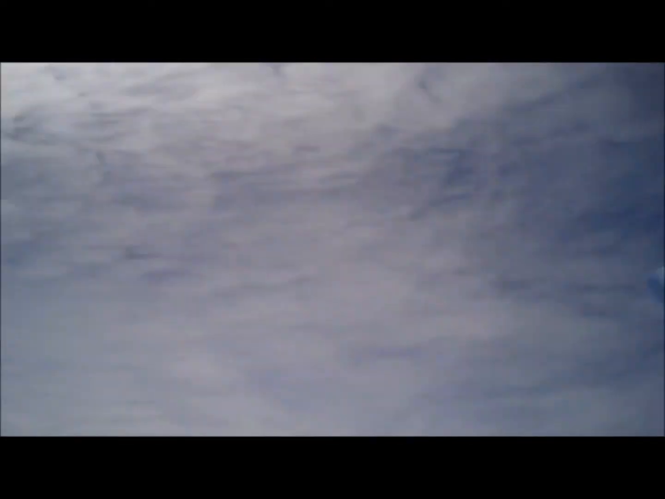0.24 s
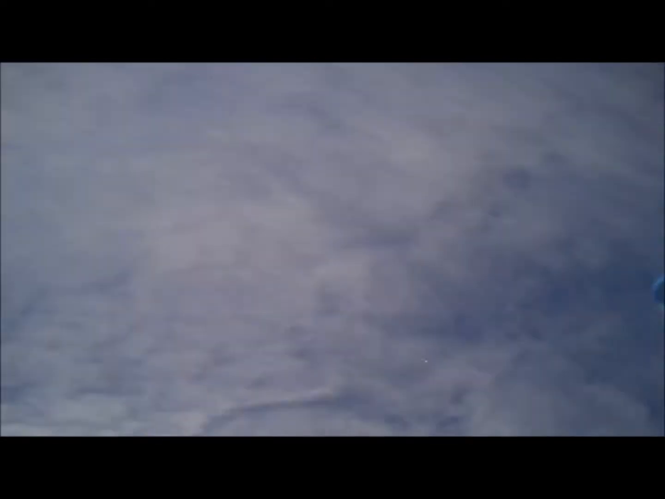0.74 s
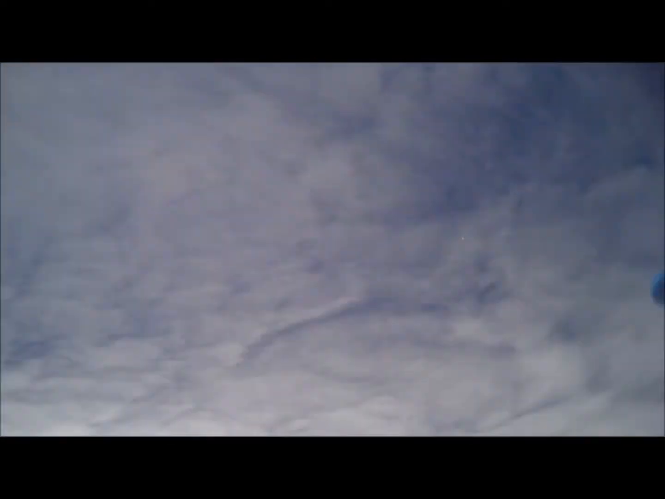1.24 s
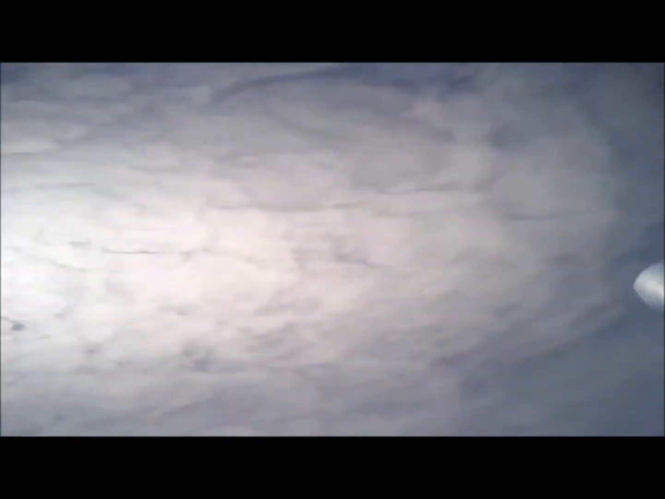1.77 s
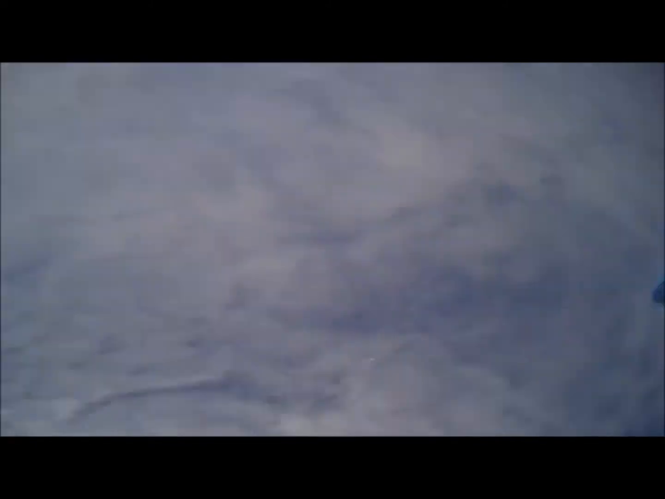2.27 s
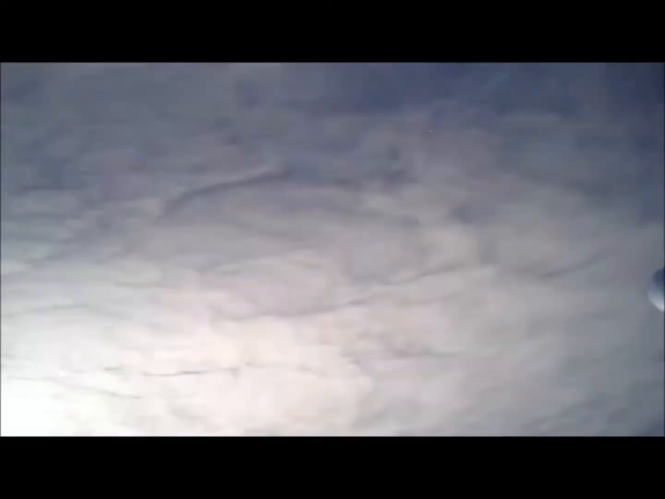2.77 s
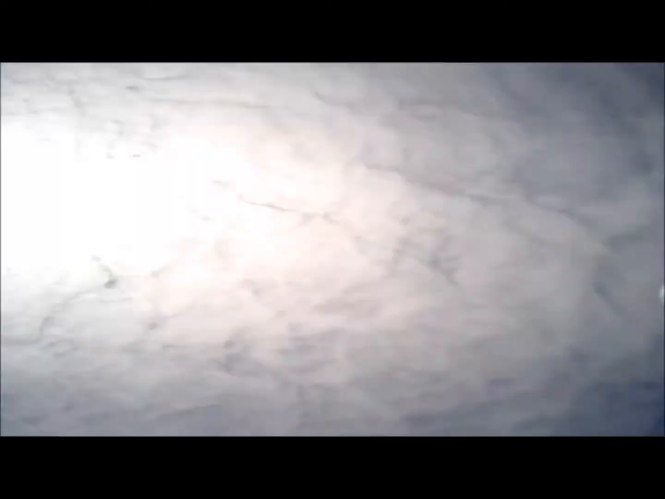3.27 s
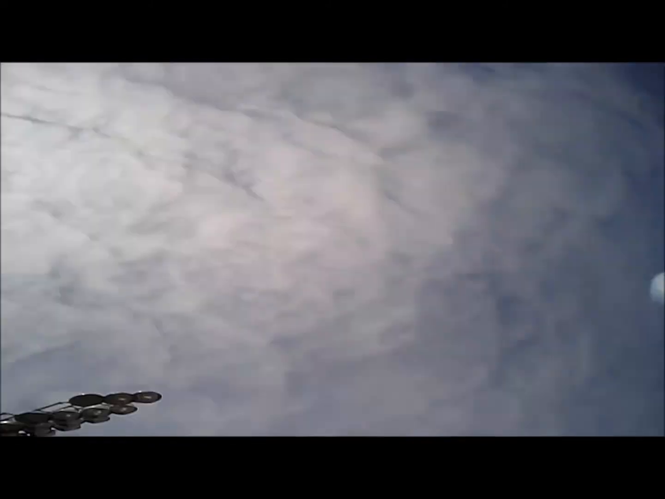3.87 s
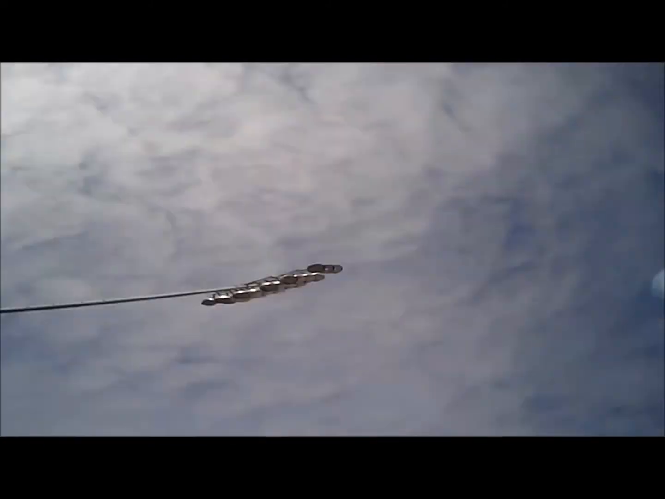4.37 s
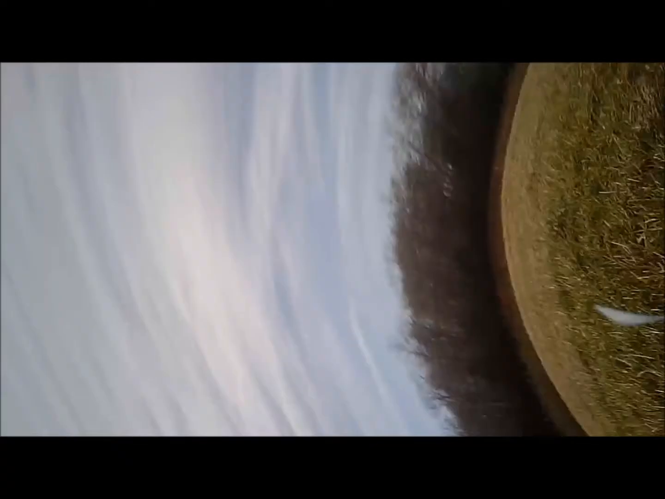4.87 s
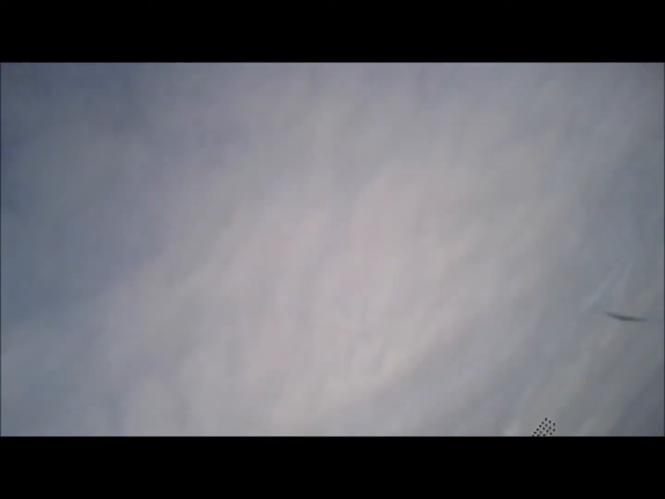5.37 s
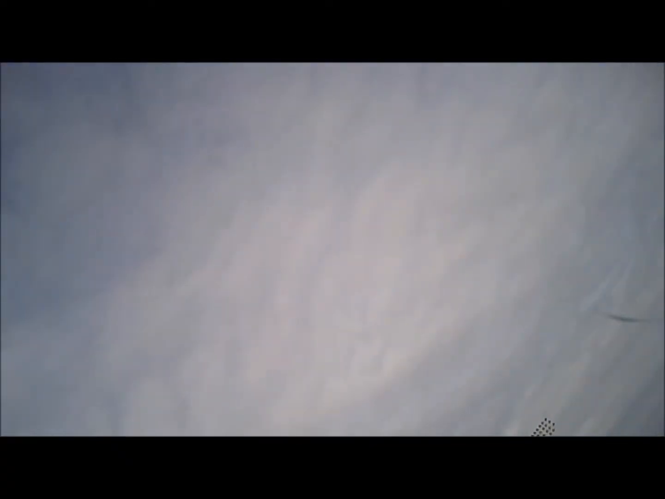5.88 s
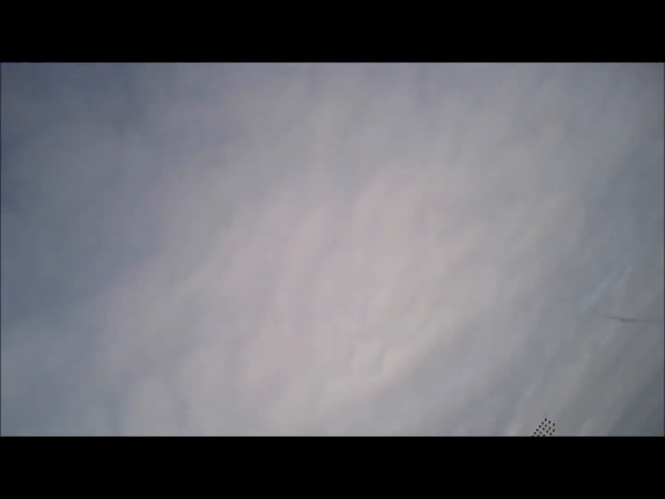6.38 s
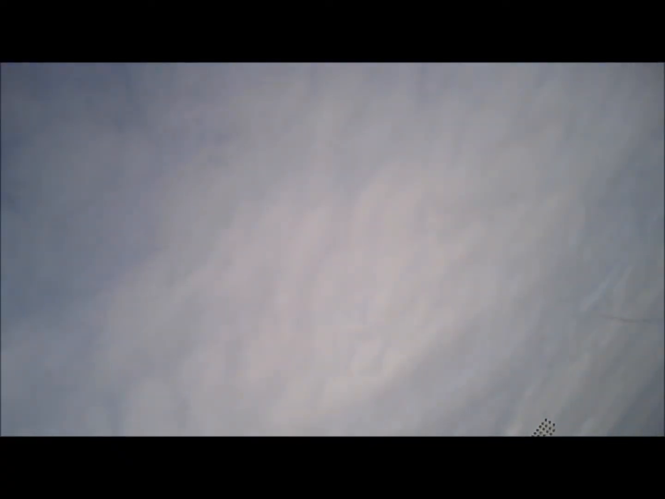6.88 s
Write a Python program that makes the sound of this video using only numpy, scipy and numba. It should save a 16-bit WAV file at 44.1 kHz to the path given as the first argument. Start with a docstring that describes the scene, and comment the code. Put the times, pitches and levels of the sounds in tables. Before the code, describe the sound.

Rushing air buffets a microphone riding on a model rocket, pulsing with each spin in whooshes, thin whistles and crackling snaps. A hard, overloaded impact cuts the wind off as the rocket strikes the ground. Its hollow shell rattles, a springy part buzzes, and two lighter knocks lead into a short slide through grass. Then the meadow is quiet, with small settling ticks, soft hiss and a low far-off drone.

```python
"""A small camera rides on a spinning model rocket. Turbulent air roars and hisses over it, crackling in gusts,
and shed eddies give a whoosh and a faint whistle on every turn. At 4.6 s the rocket slams into a meadow: the
blows ring its shell and overload the microphone. A springy part judders against the shell and buzzes on, then
the body bounces twice and slides to rest in the grass. Last, only a few settling ticks, a light breeze, a far
drone and hiss remain."""
import sys
import numpy as np
from scipy import signal
from scipy.fft import rfft, irfft, next_fast_len
from scipy.io import wavfile
from numba import njit

SR = 44100
rng = np.random.default_rng(int(sys.argv[2]) if len(sys.argv) > 2 else 0)


def store_pcm(level_fs):
    """Save levels as 16-bit WAV."""
    pcm = np.round(np.clip(level_fs, -1, 1) * 32767).astype(np.int16)
    wavfile.write(sys.argv[1], SR, np.atleast_2d(pcm).T)


N = 313992

# turns of the rocket: (time of completion [s], buffeting gain [dB], swell of the roar [dB])
TURNS = [(-0.02, 0, -4), (0.36, -4, 4), (0.71, 6, 0.5), (1.07, -5.5, 3.5), (1.46, 2.5, 3), (1.85, 3, 1),
         (2.2, 0.5, 1.5), (2.569, -2, 3), (2.939, 0, 2.5), (3.33, 2.5, 4), (3.74, 1, 3), (4.149, 3.5, 2.5),
         (4.56, -4, 2), (4.96, 1.5, 2)]


def from_db(db):
    """Amplitude ratio of a level: 20 dB is a factor of ten."""
    return 10 ** (np.asarray(db) / 20)


def unit_rms(x):
    """Normalisation to a mean power of 1."""
    return x / np.sqrt(np.mean(x ** 2) + 1e-20)


def clock():
    """Time of every sample in seconds."""
    return np.arange(N) / SR


def in_time(rows):
    """Linear interpolation of each column against the times in the first."""
    times, *columns = np.transpose(rows)
    return [np.interp(clock(), times, column) for column in columns]


def low_pass(x, hz, order=2):
    """Maximally flat filter, falling 6 dB per octave and order above the cutoff."""
    return signal.sosfilt(signal.butter(order, min(hz, .45 * SR), fs=SR, output="sos"), x)


def drift(rate_hz):
    """Random fluctuation: noise confined mostly below the given rate, rms 1."""
    size = next_fast_len(N)
    hz = np.arange(size // 2 + 1) * SR / size
    return unit_rms(irfft(rfft(rng.standard_normal(size)) / (1 + (hz / rate_hz) ** 2), size)[:N])


def coloured(spectrum):
    """Spectral shaping of white noise, rms 1."""
    hz, db = np.transpose(spectrum)
    size = next_fast_len(N)
    bin_hz = np.maximum(np.arange(size // 2 + 1) * SR / size, 1)
    gain = from_db(np.interp(np.log(bin_hz), np.log(hz), db))
    return unit_rms(irfft(rfft(rng.standard_normal(size)) * gain, size)[:N])


def resonate(x, modes):
    """Modal superposition: parallel resonances of alternating sign; white noise keeps its level."""
    out, power = 0, 0
    for k, (hz, width, db) in enumerate(modes):
        radius = np.exp(-np.pi * width / SR)
        gain = from_db(db) * (1 - radius * radius) / 2
        feedback = [1, -2 * radius * np.cos(2 * np.pi * hz / SR), radius * radius]
        out = out + (-1) ** k * signal.lfilter([gain, 0, -gain], feedback, x + 1e-18)
        power += gain * from_db(db)
    return out / np.sqrt(power)


@njit
def gliding_resonance(x, pole_angle, radius):
    """Two resonators in cascade give steep skirts around a moving centre frequency."""
    out, first, second = np.zeros(len(x)), 0j, 0j
    for i in range(len(x)):
        pole = radius * np.exp(1j * pole_angle[i])
        first = first * pole + x[i]
        second = second * pole + first
        out[i] = second.real
    return out


def turns_past(angle):
    """Phase of the spin relative to the given angle, from -0.5 to 0.5 turns."""
    turns = np.interp(clock(), np.array(TURNS)[:, 0], np.arange(len(TURNS)))
    return (turns - angle + .5) % 1 - .5


def facing(angle, spread):
    """Periodic envelope: a bell that reaches 1 as the spin passes the angle; both arguments in turns."""
    return np.exp(-.5 * (turns_past(angle) / spread) ** 2)


def airflow(rise_db_per_s=0.34, roar_flutter_db=1.08, hiss_flutter_db=1.5, wander_db=0.3):
    """Turbulence makes broadband noise: roar and hiss flutter, grow with speed and swell once a turn."""
    # spectra of the flow: (frequency [Hz], relative spectral density [dB])
    roar_spectrum = [(12, -22.5), (22, -6), (60, -6), (140, -4), (270, -2.5), (600, -3.5), (1130, -9),
                     (1840, -23.5), (2600, -29), (3400, -51)]
    hiss_spectrum = [(940, -30), (1600, -7.5), (2240, -10), (2700, -6.5), (3110, -5.5), (3690, -1),
                     (4270, -9.5), (5070, -7.5), (5750, -12.5), (6700, -9), (7750, -20.5), (8530, -17),
                     (9570, -21.5), (12300, -26), (14500, -29), (15900, -37)]
    _, swell_db = in_time(TURNS)
    speed_db = rise_db_per_s * clock() + wander_db * drift(10)
    roar_db = -18 + speed_db + swell_db * facing(angle=0.84, spread=0.1)
    hiss_db = -34 + speed_db + 2.5 * facing(angle=0.92, spread=0.19)
    flutter = drift(65)
    roar = from_db(roar_db + roar_flutter_db * flutter) * coloured(roar_spectrum)
    hiss = from_db(hiss_db + hiss_flutter_db * flutter) * coloured(hiss_spectrum)
    return roar + hiss


def once_a_turn(bands):
    """Rotation modulates amplitude and frequency: each noise band swells and glides at its own angle."""
    out = 0
    for angle, spread, hz, glide, width, db in bands:
        centre_hz = hz * 2 ** (glide * turns_past(angle))
        radius = np.exp(-np.pi * width / SR)
        band = gliding_resonance(rng.standard_normal(N), 2 * np.pi * centre_hz / SR, radius)
        out = out + unit_rms(band) * facing(angle, spread) * from_db(db)
    return out


def eddies():
    """Vortex shedding: parts turning into the wind give a falling whoosh, a thin whistle and swishes."""
    # noise bands of the microphone port, a small opening and the edges: (angle [turns], spread [turns],
    # frequency [Hz], glide [octaves/turn], resonator bandwidth [Hz], level [dB])
    port_bands = [(0.92, 0.11, 330, -1, 260, -22.5), (0.2, 0.11, 170, -1.5, 260, -16.5)]
    whistle_bands = [(0.995, 0.045, 12360, -0.6, 1500, -47.5)]
    edge_bands = [ (0.31, 0.15, 4395, 0.11, 1535, -36), (0.56, 0.19, 1396, 0.021, 507, -32),
                  (0.72, 0.12, 7710, 0.47, 1190, -47), (0.77, 0.11, 2630, 1.0, 900, -36.5),
                  (0.86, 0.15, 12340, 0.1, 7020, -49.5)]
    buffet_db, _ = in_time(TURNS)
    whoosh = from_db(buffet_db) * once_a_turn(port_bands)
    return whoosh + once_a_turn(whistle_bands) + once_a_turn(edge_bands)


def add_burst(out, start_s, db, t60, noise):
    """Exponential decay: the noise starts at once and falls 60 dB in t60 seconds."""
    start = int(start_s * SR)
    age = np.arange(len(noise)) / SR
    burst = unit_rms(noise) * from_db(db - 60 * age / t60)
    out[start:start + len(noise)] += burst[:N - start]


def add_blows(out, blows, order=1, size=8820):
    """Impulsive excitation as bursts of low-passed noise: each blow has its own cutoff."""
    for start_s, db, t60, cutoff_hz in blows:
        add_burst(out, start_s, db, t60, low_pass(rng.standard_normal(size), cutoff_hz, order=order))


def gusts(crackle_db=2.0, rasp_grain_db=6.0, rasp_hz=4500):
    """Flow separation: the air tears loose for a moment, crackling and snapping on the microphone."""
    # bursts of turbulence: (time [s], spread [s], level [dB], pitch shift [octaves], rasp level [dB])
    bursts = [(0.297, 0.012, -9, -0.3, -23), (0.642, 0.01, -10, 0.14, -25), (1.85, 0.019, -7, 0.38, -24),
              (2.115, 0.011, -28, 0.5, -31), (3.24, 0.025, -20.5, 0.6, -36),
              (4.085, 0.017, -15.5, 0.3, -30), (4.512, 0.012, -12.5, 0.36, -34)]
    # spectrum of a burst before its shift: (frequency [Hz], relative spectral density [dB])
    burst_spectrum = [(30, -17.5), (150, 0.5), (300, 10.5), (800, 1.5), (1300, -10.5), (2000, -19.5),
                      (3500, -17), (7000, -49), (15000, -45)]
    # snaps of the flow at the microphone port: (time [s], level [dB], t60 [s], cutoff [Hz])
    snaps = [(0.2494, -8, 0.0061, 2500), (0.3064, -12.5, 0.0047, 12000), (0.618, -8.5, 0.016, 1500),
             (0.903, -7, 0.015, 1100), (1.8215, -11, 0.007, 3500), (1.841, -4.5, 0.012, 3500),
             (2.144, -17, 0.012, 1800), (2.484, -18, 0.011, 4000)]
    grain = drift(370)
    crackle = unit_rms(from_db(crackle_db * grain))
    rasp = unit_rms(low_pass(rng.standard_normal(N) * from_db(rasp_grain_db * grain), rasp_hz))
    out = np.zeros(N)
    for peak_s, spread, db, octaves, rasp_db in bursts:
        flap = coloured([(hz * 2 ** octaves, level_db) for hz, level_db in burst_spectrum])
        envelope = np.exp(-.5 * ((clock() - peak_s) / spread) ** 2)
        out += envelope * (from_db(db) * flap * crackle + from_db(rasp_db) * rasp)
    add_blows(out, snaps, order=2)
    return out


def add_knocks(out, knocks, size=8820):
    """Band-limited transients: each knock is a decaying burst of noise from one resonance."""
    for start_s, db, t60, hz, width in knocks:
        band = resonate(rng.standard_normal(2 * size), [(hz, width, 0)])
        add_burst(out, start_s, db, t60, band[size:])   # steady state only


def landing():
    """Forced vibration: blows, ticks and scraping grass drive the shell's modes; heavy blows thud."""
    # blows of the crash and two bounces: (time [s], level [dB], t60 [s], cutoff [Hz])
    blows = [(4.6133, 16, 0.044, 12000), (4.619, 12, 0.037, 706), (4.6229, 11, 0.013, 8000),
             (5.1301, -18, 0.016, 14000), (5.1343, 2.5, 0.012, 16000), (5.1417, -7, 0.047, 7000),
             (5.1508, -12, 0.02, 5020), (5.267, -12, 0.033, 4500), (5.2786, -7, 0.037, 3600)]
    # ringing of the hollow body, and stalks ticking against it:
    # (time [s], level [dB], t60 [s], frequency [Hz], bandwidth [Hz])
    body_thuds = [(4.617, 0.5, 0.075, 40, 90), (4.614, 4.5, 0.05, 3680, 250), (4.619, 5, 0.071, 660, 200),
                  (4.632, -1.5, 0.1, 1110, 130), (5.143, -14, 0.04, 830, 350),
                  (5.136, -28.5, 0.07, 250, 200), (5.153, -21.5, 0.09, 35, 30),
                  (5.267, -25, 0.029, 550, 300), (5.279, -16, 0.049, 760, 260)]
    stalk_ticks = [(5.092, -39, 0.018, 7300, 1200), (5.185, -28, 0.012, 3500, 5000),
                   (5.1955, -35, 0.012, 9000, 8000), (5.394, -28, 0.015, 5000, 2500),
                   (5.407, -33, 0.04, 1400, 1200), (5.505, -45.5, 0.017, 3500, 2000),
                   (5.701, -39, 0.016, 1700, 2400), (6.7612, -33.5, 0.014, 4060, 2400)]
    # modes of body and camera shell: (frequency [Hz], bandwidth [Hz], relative gain [dB])
    shell_modes = [(865, 100, -10), (1120, 200, 0.5), (1348, 230, 2), (1640, 260, -4), (2460, 550, -5),
                   (3697, 340, -1), (5246, 410, -5.5), (6890, 630, -6.5), (9800, 2300, -15),
                   (14000, 2700, -16.5)]
    contact = sliding()
    add_blows(contact, blows + judder())
    add_knocks(contact, stalk_ticks)
    thuds = np.zeros(N)
    add_knocks(thuds, body_thuds)
    return resonate(contact, shell_modes) + thuds


def judder(start_s=4.634, period_s=0.0098, first_db=-0.5, loss_db=6.3, t60=0.03, cutoff_hz=900, count=6):
    """Damped oscillation after the crash: evenly spaced blows, each weaker by the same ratio."""
    return [(start_s + k * period_s, first_db - k * loss_db, t60, cutoff_hz) for k in range(count)]


def buzz(rate_hz=101, touch_cycles=0.1, jitter_cycles=0.08, fade_db_per_s=66, uneven_db=3.0):
    """Intermittent contact: a springy part brushes the shell twice per wide swing, once per small one."""
    # modes of the buzzing part: (frequency [Hz], bandwidth [Hz], relative gain [dB])
    modes = [(1160, 220, -5), (2520, 360, -1.5), (3930, 400, -1.5), (5150, 440, -3), (6850, 890, 0),
             (8800, 600, -5.5), (10200, 700, -4), (14300, 790, 2)]
    start_s, attack_s, wide_for_s, end_s, release_s = 4.68, 0.097, 0.13, 4.955, 0.033
    age = np.maximum(clock() - start_s, 0)
    gate = np.clip(np.minimum(age / attack_s, (end_s - clock()) / release_s), 0, 1)
    level = gate * from_db(-36.5 - fade_db_per_s * age + uneven_db * drift(60))
    swings = rate_hz * clock() + jitter_cycles * drift(40)
    out_touch, back_touch = [unit_rms(np.exp(-.5 * ((phase % 1 - .5) / touch_cycles) ** 2))
                             for phase in (swings, swings + .5)]
    wide = np.clip(1 - (age / wide_for_s) ** 2, 0, 1)
    touches = (out_touch + wide * back_touch) * rng.standard_normal(N)
    return resonate(touches * level, modes)


def sliding(speed_power=2.13, grain_db=3.0, rub_hz=1800, dull_from_s=5.264, dulling_s=0.14):
    """Friction noise of grass follows a power of the speed; sharp scratching gives way to dull rubbing."""
    # slides: (start [s], time of top speed [s], stop [s], level at top speed [dB])
    slides = [(5.15, 5.158, 5.21, -27.5), (5.126, 5.272, 5.537, -23.5)]
    level = sum(from_db(db) * np.interp(clock(), [start, fastest, stop], [0, 1, 0]) ** speed_power
                for start, fastest, stop, db in slides)
    sharp_share = 0.83 * np.exp(-np.maximum(clock() - dull_from_s, 0) / dulling_s)
    scratch = unit_rms(rng.standard_normal(N) * from_db(grain_db * drift(500)))
    rub = unit_rms(low_pass(scratch, rub_hz, order=1))
    return level * (sharp_share * scratch + (1 - sharp_share) * rub)


def meadow(hiss_db=-51, drone_hz=81, drone_width_hz=14):
    """Ambient noise, masked during the flight: faint hiss, a light breeze and a far narrow-band drone."""
    # the quiet meadow with the microphone's self-noise, and light air on the microphone:
    # (frequency [Hz], relative spectral density [dB])
    hiss_spectrum = [(20, -20.5), (200, -22), (400, -22), (700, -22), (1400, -28), (4500, -34.5),
                     (10800, -37), (15900, -39)]
    breeze_spectrum = [(12, -9.5), (30, -5), (60, -1), (100, -0.5), (150, -2.5), (220, -9), (350, -16),
                       (800, -35), (3000, -68)]
    # course of the low background: (time [s], breeze level [dB], drone level [dB])
    levels = [(4.7, -45, -59.5), (5.1, -47, -58), (5.3, -56.5, -67.5), (5.5, -50, -61), (6.4, -50.5, -51.5),
              (7.1, -49, -57)]
    breeze_db, drone_db = in_time(levels)
    rumble = low_pass(rng.standard_normal(N), 200)
    drone = from_db(drone_db) * unit_rms(resonate(rumble, [(drone_hz, drone_width_hz, 0)]))
    hiss = from_db(hiss_db) * coloured(hiss_spectrum)
    breeze = from_db(breeze_db) * coloured(breeze_spectrum)
    return hiss + breeze + drone


def scene(landing_s=4.613, wind_t60=0.065):
    """Superposition of all sources; the flow noise dies as the ground stops the rocket."""
    flying = from_db(-60 * np.clip((clock() - landing_s) / wind_t60, 0, 2))
    wind = flying * (airflow() + eddies() + gusts())
    return (wind + landing() + buzz() + meadow())[None]


def record(dry, offset=0.011, ceiling=0.97, cutoff_hz=15350):
    """Overload: the converter sits slightly off zero and clips hard; a steep low-pass cuts the top."""
    clipped = np.clip(dry + offset, -ceiling, ceiling)
    return signal.sosfilt(signal.ellip(10, .1, 80, cutoff_hz, fs=SR, output="sos"), clipped)


dry = scene()
out = record(dry)
store_pcm(out)
```